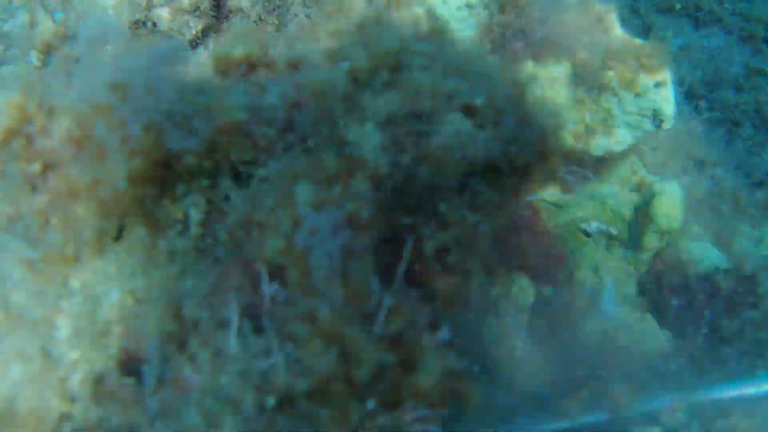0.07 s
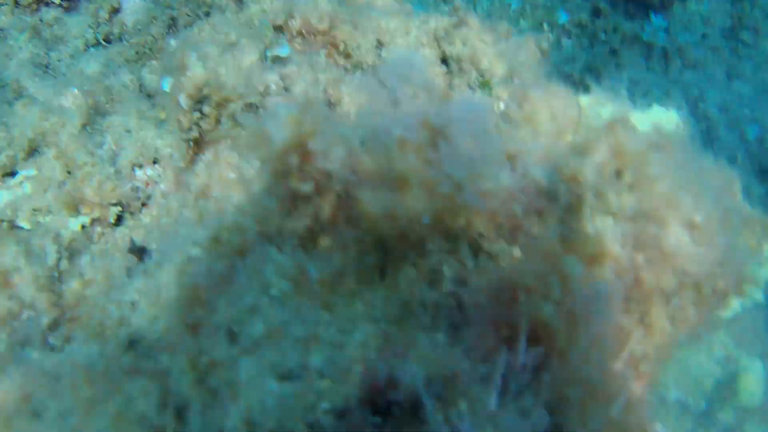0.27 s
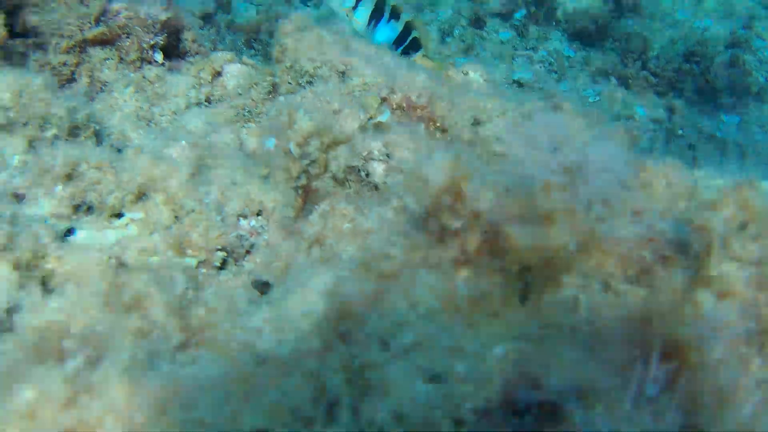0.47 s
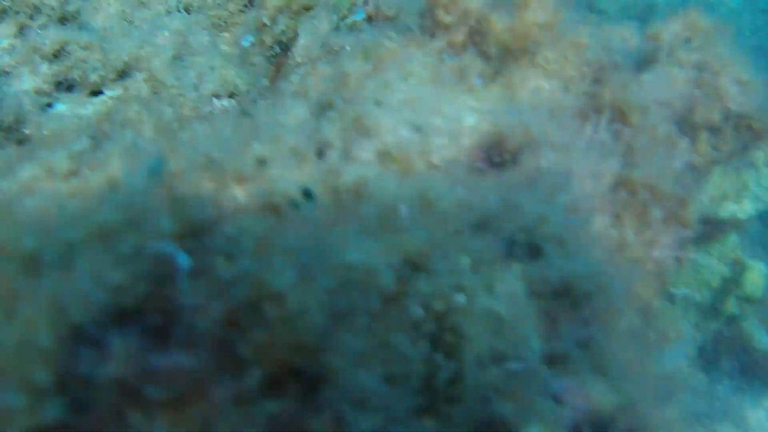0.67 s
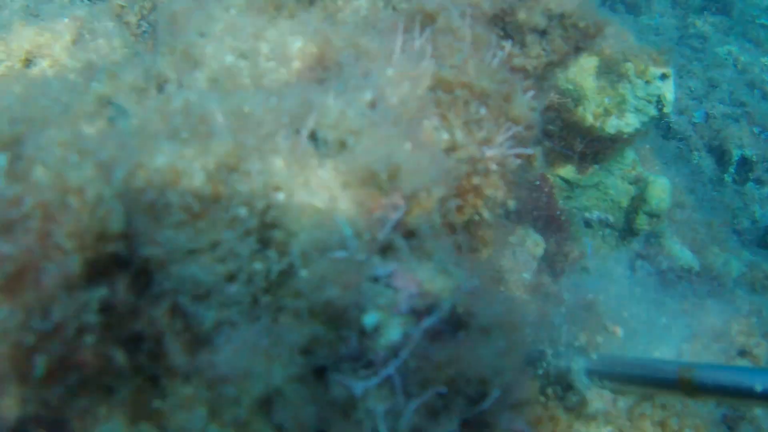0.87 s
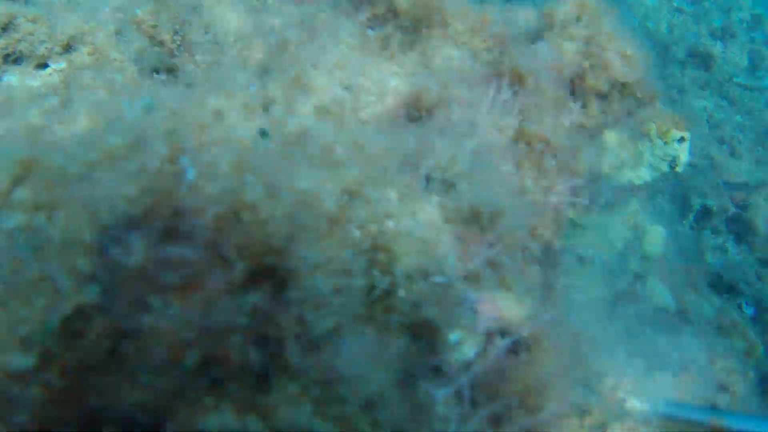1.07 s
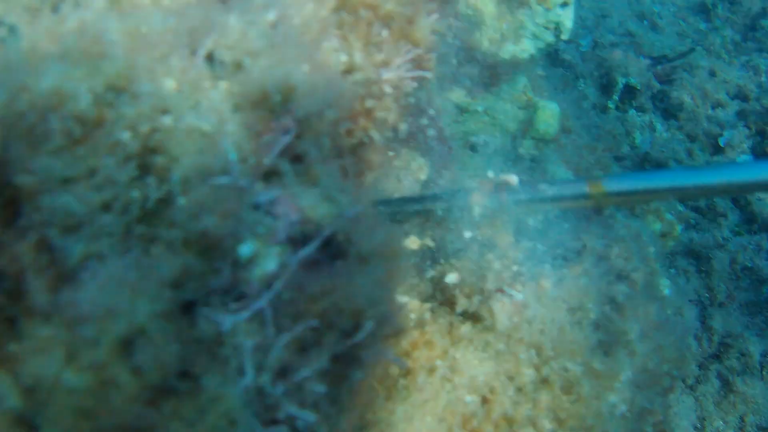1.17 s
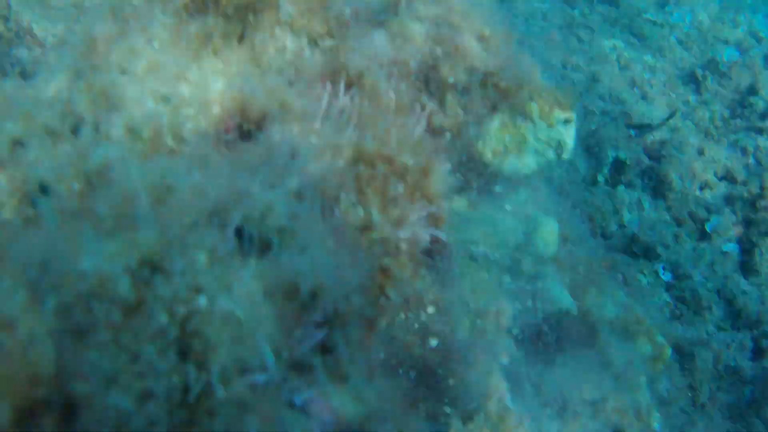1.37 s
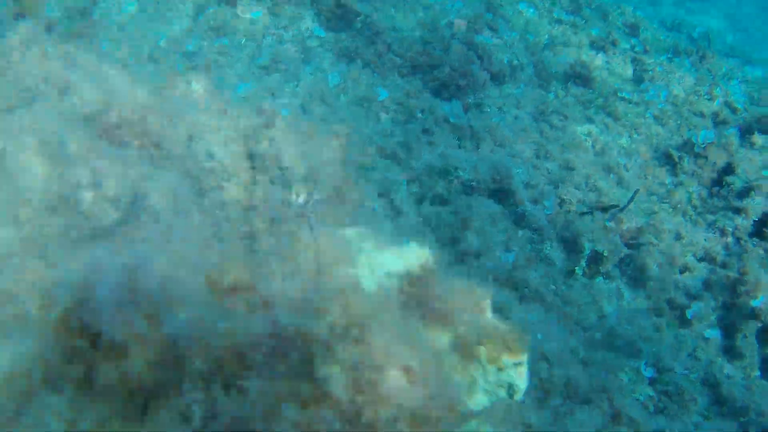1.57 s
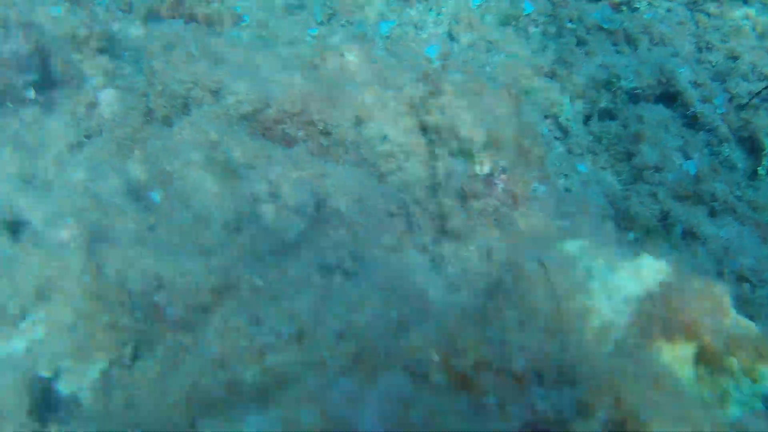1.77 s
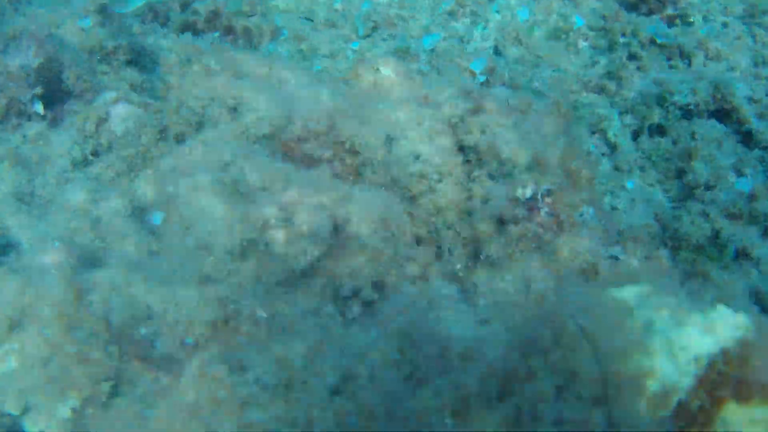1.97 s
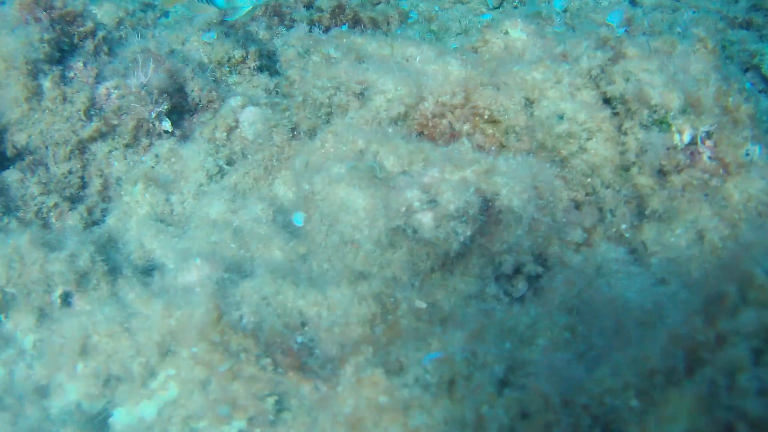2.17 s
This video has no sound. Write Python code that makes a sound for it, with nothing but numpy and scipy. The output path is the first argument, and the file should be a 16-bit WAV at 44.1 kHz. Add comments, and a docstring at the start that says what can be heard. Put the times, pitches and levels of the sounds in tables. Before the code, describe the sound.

Dull thumps and hollow knocks jostle an underwater camera housing throughout, heard close and muffled from inside. They come irregularly, with short rubs and slight gritty crunches, strongest at the start, around 0.7 to 1.0 seconds, near 1.3 and in a rapid flurry at 1.5. After a brief lull, softer bumps continue until about 2.2 seconds. Churning seawater rumbles underneath, with faint reef fizz and clicks.

```python
"""Irregular bumps of a sealed camera housing, jostled over a rocky, weedy seabed under churning seawater.
Each bump shoves the water with a dull thump, knocks the case, rings its wall and crunches a little grit.
Between the bumps the case rubs along in quick slips and eddies rumble round it.
Faint fizz, crackle and clicks come from the reef behind."""
import sys
import numpy as np
from scipy import signal
from scipy.fft import rfft, irfft, next_fast_len
from scipy.io import wavfile
from scipy.ndimage import uniform_filter1d, map_coordinates

SR = 44100
rng = np.random.default_rng(int(sys.argv[2]) if len(sys.argv) > 2 else 0)


def materialize(psi):
    """Save the field psi as 16-bit PCM at rate SR to the path in sys.argv[1].

    A 1-D psi becomes a single channel; in a 2-D psi each row is a channel.
    """
    bounded = np.clip(np.atleast_2d(psi).T, -1, 1)
    quanta = np.round(bounded * 32767).astype(np.int16)
    wavfile.write(sys.argv[1], SR, quanta)


N = 97240


def amp(db):
    """Decibels to gain."""
    return 10 ** (np.asarray(db) / 20)


def unit(x):
    """Scale to rms 1."""
    return x / np.sqrt(np.mean(x ** 2) + 1e-20)


def crest(x):
    """Scale so that the envelope, averaged over a millisecond, peaks at 1."""
    return x / (uniform_filter1d(np.abs(signal.hilbert(x)), size=44).max() + 1e-12)


def add(track, s, sound):
    """Mix a sound into a track at time s."""
    i = max(round(s * SR), 0)
    track[i:i + len(sound)] += sound[:max(len(track) - i, 0)]


def wobble(rate):
    """A smooth random curve, rate knots a second."""
    return map_coordinates(rng.standard_normal(int(N * rate / SR) + 4), [np.arange(N) * rate / SR])


def response(points, modes=None, size=8192):
    """Impulse response of an EQ curve (f/Hz, level/dB), with resonances if given."""
    f = np.fft.rfftfreq(size, 1 / SR)
    hz, db = np.transpose(points)
    gain = amp(np.interp(np.log(f + 1), np.log(hz), db))
    if modes is not None:
        peaks = [amp(level) * f * width / (centre ** 2 - f ** 2 + 1j * f * width)
                 for centre, width, level in modes]
        gain = gain * np.sqrt(sum(np.abs(peak) ** 2 for peak in peaks))
    # minimum phase: nothing rings ahead of the hit
    cepstrum = irfft(np.log(np.maximum(gain, 1e-5)))
    cepstrum[1:size // 2] *= 2
    cepstrum[size // 2 + 1:] = 0
    return irfft(np.exp(rfft(cepstrum)))[:size // 2]


def through(x, ir):
    """Pass a signal through an impulse response."""
    return signal.fftconvolve(x, ir)[:len(x)]


def noise(ir):
    """Steady noise at rms 1, coloured by an impulse response."""
    return unit(through(rng.standard_normal(N), ir))


def focused(ir, centre_hz, boost_db, width_oct=0.33):
    """An impulse response with a bell boost round centre_hz."""
    hz = np.geomspace(100, 16000, num=80)
    bell_db = boost_db * np.exp(-(np.log2(hz / centre_hz) / width_oct) ** 2)
    return through(ir, response(np.column_stack([hz, bell_db])))


def grains(rate, scatter_db, size=N):
    """Random impulses of scattered strength, about rate a second."""
    fires = rng.random(size) < rate / SR
    strength = amp(scatter_db * np.clip(rng.standard_normal(size), -2, 2))
    return fires * np.sign(rng.standard_normal(size)) * strength


def swell(t, rise_s, shape):
    """An envelope that crests at rise_s and then dies; a higher shape is tighter."""
    return (t / rise_s * np.exp(1 - t / rise_s)) ** shape


# hollow modes of the case and brighter modes of its wall (f/Hz, width/Hz, level/dB)
CASE_MODES = [(312.5, 110, 0.5), (494.6, 21, -2), (599, 51, -2), (778.6, 64.5, 0)]
WALL_MODES = [(1192, 78, 1.5), (1453, 43, -8.5), (1660, 154, -4), (2154, 126, -6), (2840, 1300, -22)]
# EQ curves of the case, the wall and the grit (f/Hz, level/dB)
CASE_EQ = [(120, -31), (280, -1), (820, -5.5), (1020, -21.5), (2500, -80.5)]
WALL_EQ = [(700, -42), (1120, 4.5), (1750, 1.5), (3000, -6.5), (5000, -33)]
GRIT_EQ = [(900, -36), (2300, 9.5), (4000, 6.5), (6100, 5), (7300, -4.5), (8600, -0.5), (10000, -14),
           (15500, -22.5)]


def materials():
    """How the case, its wall and the grit each answer a sharp tap."""
    return response(CASE_EQ, CASE_MODES), response(WALL_EQ, WALL_MODES), response(GRIT_EQ)


GRIT_RISE_S = 0.00091


def crunch(t, grit):
    """A noise burst a few milliseconds long, with the colour of crushed grit."""
    burst = swell(t, GRIT_RISE_S, shape=0.51) * rng.standard_normal(len(t))
    return crest(through(burst, grit))


# fader ride shared by fizz and crackle (t/s, relative level/dB)
REEF_RIDE = [(0, -39.5), (.2, -50), (.3, -54), (.41, -47), (.6, -49), (.83, -53.5), (1.02, -58), (1.3, -52),
             (1.6, -65), (1.8, -59), (1.92, -55.5), (2.2, -50.5)]
# EQ curve of the fizz (f/Hz, level/dB)
FIZZ_EQ = [(900, 10), (2200, 6), (3600, -1.5), (4900, 0.5), (5500, -6.5), (6300, 1), (7300, -5),
           (8700, -2.5), (10000, -14), (15500, -15.5)]
# nearer reef clicks (t/s, centre f/Hz, level/dB)
REEF_CLICKS = [(0.107, 3050, -38.5), (0.743, 5860, -24), (0.885, 3160, -35.5), (0.925, 8800, -27),
               (1.66, 4200, -42), (2.018, 4420, -42.5), (2.162, 6440, -35.5)]
FIZZ_DB, CRACKLE_DB = -4, -11.5


def reef(grit):
    """The reef's faint bed of fizz, with sparse crackle and a few nearer clicks."""
    t = np.arange(SR // 30) / SR
    ride = amp(np.interp(np.arange(N) / SR, *np.transpose(REEF_RIDE)))
    fizz = noise(response(FIZZ_EQ))
    crackle = unit(through(grains(rate=60, scatter_db=-2.5), crunch(t, grit)))
    out = ride * (amp(FIZZ_DB) * fizz + amp(CRACKLE_DB) * crackle)
    for s, centre_hz, db in REEF_CLICKS:
        click = crunch(t, focused(grit, centre_hz, boost_db=8))
        add(out, s - GRIT_RISE_S, amp(db) * click)
    return out


# fader rides of the churning water (t/s, relative rumble level/dB, relative wash level/dB)
WATER_RIDE = [(0, -30, -14.5), (0.109, -38.5, -39), (.22, -32, -33.5), (.33, -37.5, -40), (.42, -31, -33),
              (.57, -21.5, -31), (.64, -33, -35), (.72, -26.5, -41), (.82, -29.5, -31.5), (.92, -20, -30.5),
              (1.04, -35.5, -36.5), (1.2, -35, -34.5), (1.32, -17.5, -34), (1.42, -36.5, -35),
              (1.579, -34, -40.5), (1.649, -47, -51), (1.719, -38.5, -37.5), (1.82, -27, -40),
              (1.94, -27.5, -33), (2.04, -33, -36.5), (2.2, -25.5, -30)]
# EQ curve of the rumble (f/Hz, level/dB)
RUMBLE_EQ = [(15, -37), (30, -4), (60, -3.5), (115, 4.5), (190, 1), (280, -13.5), (500, -38.5), (1200, -50),
             (3000, -100)]
RUMBLE_TRIM_DB, WASH_TRIM_DB, WALL_PATTER_DB, LUMP_DB = 2.5, -3, -20, 2.5


def water(case, wall):
    """Lumpy eddies rumble round the housing and wash against its walls."""
    s, rumble_db, wash_db = np.transpose(WATER_RIDE)
    t = np.arange(N) / SR
    lumps_db = LUMP_DB * wobble(rate=39.71)
    rumble_gain = amp(np.interp(t, s, rumble_db) + RUMBLE_TRIM_DB + lumps_db)
    wash_gain = amp(np.interp(t, s, wash_db) + WASH_TRIM_DB + lumps_db)
    rumble, wash = noise(response(RUMBLE_EQ)), noise(case)
    patter = unit(through(grains(rate=210, scatter_db=3.5), wall))
    return rumble_gain * rumble + wash_gain * (wash + amp(WALL_PATTER_DB) * patter)


# rubs along the housing (t/s, length/s, centre f/Hz, case level/dB, wall level/dB, grit level/dB)
RUB_CUES = [(0.0, 0.026, 580, -22.5, -30, -46.5), (0.185, 0.02, 440, -32.5, -45, -50.5),
            (0.217, 0.027, 880, -34, -44.5, -74), (0.284, 0.023, 727, -44, -44.5, -56),
            (0.345, 0.044, 780, -27, -38.5, -55.5), (0.396, 0.062, 433, -30.5, -42.5, -51.5),
            (0.565, 0.034, 500, -24, -41.5, -42), (0.681, 0.048, 366, -25.5, -58, -57),
            (0.738, 0.047, 530, -24.5, -33, -46), (0.844, 0.093, 410, -25, -54, -69),
            (1.051, 0.048, 400, -30.5, -47, -68), (1.231, 0.052, 685, -20.5, -41, -64.5),
            (1.324, 0.026, 555, -21.5, -34.5, -50.5), (1.473, 0.078, 728, -20.5, -33, -55),
            (1.889, 0.028, 586, -28.5, -54, -55), (2.075, 0.029, 860, -29, -55.5, -84)]
RUB_ATTACK_S, RUB_RELEASE_S, SLIPS_PER_S, GRIT_TICKS_PER_S = 0.0011, 0.0015, 650, 380


def rubs(case, wall, grit):
    """Quick irregular slips excite the case and the wall; sparser grains of grit tick on top."""
    out, t = np.zeros(N), np.arange(SR // 5) / SR
    for s, length, centre_hz, case_db, wall_db, grit_db in RUB_CUES:
        stroke = np.clip(t / RUB_ATTACK_S, 0, 1) * np.exp(-np.maximum(t - length, 0) / RUB_RELEASE_S)
        stroke_rms = np.sqrt(np.mean(stroke ** 2))
        layers = [(case_db, SLIPS_PER_S, focused(case, centre_hz, boost_db=9.5)),
                  (wall_db, SLIPS_PER_S, wall),
                  (grit_db, GRIT_TICKS_PER_S, crunch(t, grit))]
        for db, rate, ir in layers:
            slips = stroke * grains(rate, scatter_db=0, size=len(t))
            add(out, s, amp(db) * stroke_rms * unit(through(slips, ir)))
    return out


def pulse(t, hz, rise_cycles, shape):
    """A heavily damped swing of a cycle or two; higher ones are shorter."""
    return swell(t, rise_cycles / hz, shape) * np.sin(2 * np.pi * (hz * t - rise_cycles))


# hits on the housing, levels relative within each layer (t/s, thump f/Hz, thump level/dB,
# knock f/Hz, knock level/dB, ring centre f/Hz, ring level/dB, grit level/dB)
BUMP_CUES = [(0.007, 160, -10.5, 550, -3, 1720, -16, -24),
             (0.045, 169, -10.5, 434, -14.5, 2550, -15.5, -21.5),
             (0.148, 170, -13.5, 560, -12, 1630, -29, -59), (0.161, 213, -19, 463, -14.5, 1630, -28, -38),
             (0.347, 205, -24, 640, -9.5, 1570, -24, -48), (0.359, 185, -8, 475, -11, 1850, -24.5, -35),
             (0.373, 190, -8.5, 680, -18, 1410, -36, -56), (0.383, 193, -14.5, 650, -13, 1850, -31, -44),
             (0.44, 205, -13, 450, -6.5, 1690, -26, -25.5), (0.454, 170, -15.5, 560, -13.5, 1310, -36, -45),
             (0.475, 165, -14, 600, -16.5, 1380, -33.5, -40), (0.504, 146, -11, 392, -15, 1410, -36, -42),
             (0.539, 168, -14, 500, -24, 1300, -42, -39.5), (0.551, 162, -9, 476, -31, 1400, -37, -47),
             (0.576, 167, -5.5, 460, -33, 1600, -40, -30.5), (0.592, 150, -4, 548, -12.5, 1380, -21, -30),
             (0.663, 154, -15.5, 600, -20, 1480, -34.5, -45),
             (0.707, 180, -14.5, 354, -17, 1500, -34.5, -39), (0.74, 135, -2, 620, -5.5, 1410, -22.5, -24),
             (0.746, 149, -38, 465, -5, 1420, -22, -25.5), (0.759, 160, -9.5, 490, -15, 1430, -28, -34),
             (0.776, 145, -2.5, 550, -10.5, 1550, -15.5, -27.5),
             (0.86, 190, -9, 420, -7.5, 1360, -37.5, -48), (0.896, 219, -3.5, 440, -2, 1500, -25.5, -40),
             (0.923, 185, -8, 400, -2.5, 1570, -18.5, -35), (0.956, 154, -10.5, 400, -12, 1180, -29, -56),
             (0.988, 150, -9.5, 398, -5, 1360, -28, -44), (1.167, 115, -18, 580, -23.5, 1290, -42, -58),
             (1.273, 144, -2, 502, -12.5, 1420, -21.5, -41.5),
             (1.315, 164, -10.5, 510, -10, 1250, -36, -66), (1.327, 121, -2.5, 532, -11, 1400, -43.5, -52),
             (1.344, 143, -1, 600, -7, 1340, -27, -33.5), (1.397, 132, -18.5, 388, -23, 1380, -36.5, -63),
             (1.446, 170, -19.5, 470, -26, 1680, -37.5, -48),
             (1.482, 146, -13.5, 640, -5.5, 1330, -14, -30), (1.5, 172, -5.5, 584, -12, 2300, -24, -38),
             (1.51, 162, -10.5, 580, -11, 1570, -15.5, -27.5),
             (1.518, 151, -2.5, 730, -14, 1280, -19.5, -29), (1.53, 163, -6, 520, -23, 1310, -37, -53.5),
             (1.539, 153, -6, 730, -23, 1200, -17.5, -41), (1.548, 144, -1.5, 555, -4.5, 1180, -23, -32.5),
             (1.747, 132, -8, 496, -28, 1300, -61, -57), (1.811, 157, -8.5, 336, -20.5, 1290, -66, -47.5),
             (1.865, 149, -19, 553, -24.5, 1300, -55, -53), (1.892, 195, -5.5, 423, -25, 1310, -39.5, -44),
             (1.909, 163, -7, 516, -14, 1330, -43, -52), (2.056, 158, -11.5, 348, -40, 1300, -62, -50),
             (2.07, 172, -14, 544, -17.5, 1390, -46, -45), (2.145, 130, -15.5, 425, -18, 1300, -45, -57)]
THUMP_TRIM_DB, KNOCK_TRIM_DB, GRIT_TRIM_DB = 0.5, -3.5, -3
THUMP_RISE_CYCLES, RING_RISE_S = 0.74, 0.001
BOOM_HZ, BOOM_T60_S, BOOM_DB = 117, 0.073, -15.5  # the whole housing sways on after a thump
RATTLE_DECAY_S, RATTLE_DB = 0.0019, -4.5  # a burst stirs the case modes under each knock
GRIT_LEAD_S = 0.00057  # grit gives way just before the case is hit


def bumps(case, wall, grit):
    """Each hit stacks a low shove of water, a hollow knock, a short wall ring and a crunch."""
    out, t = np.zeros(N), np.arange(SR // 8) / SR
    boom_envelope = amp(BOOM_DB - 60 * t / BOOM_T60_S) * (1 - np.exp(-t * BOOM_HZ))
    boom = boom_envelope * np.sin(2 * np.pi * (BOOM_HZ * t - THUMP_RISE_CYCLES))
    for s, thump_hz, thump_db, knock_hz, knock_db, ring_hz, ring_db, grit_db in BUMP_CUES:
        thump = pulse(t, thump_hz, THUMP_RISE_CYCLES, shape=2.04) + boom
        burst = np.exp(-t / RATTLE_DECAY_S) * rng.standard_normal(len(t))
        rattle = crest(through(burst, case))
        knock = pulse(t, knock_hz, rise_cycles=1.369, shape=8.1) + amp(RATTLE_DB) * rattle
        struck_wall = focused(wall, ring_hz, boost_db=13)
        ring_attack = (1 - np.exp(-t[:len(struck_wall)] / RING_RISE_S)) ** 2
        add(out, s, amp(thump_db + THUMP_TRIM_DB) * thump)
        add(out, s, amp(knock_db + KNOCK_TRIM_DB) * knock)
        add(out, s, amp(ring_db) * crest(struck_wall * ring_attack))
        add(out, s - GRIT_LEAD_S, amp(grit_db + GRIT_TRIM_DB) * crunch(t, grit))
    return out


def scene():
    """Bumps and rubs up front, water and reef behind, in mono as heard inside the housing."""
    case, wall, grit = materials()
    mix = bumps(case, wall, grit) + rubs(case, wall, grit) + water(case, wall) + reef(grit)
    return mix[None]


# EQ curve of the camera's hiss (f/Hz, level/dB)
HISS_EQ = [(900, 10.5), (2500, 1.5), (3600, -0.5), (4800, 11), (5800, -13), (7500, -1.5), (10000, -2),
           (15500, -5.5)]
HISS_DB, LOW_CUT_HZ, HIGH_CUT_HZ = -59.5, 100.3, 15900


def record(dry):
    """The camera thins the deep bass, hisses faintly, soft-clips the peaks and cuts the very top."""
    thin = signal.sosfilt(signal.butter(1, LOW_CUT_HZ, "highpass", fs=SR, output="sos"), dry)
    hissy = thin + amp(HISS_DB) * noise(response(HISS_EQ))
    rounded = hissy / (1 + np.abs(hissy) ** 8) ** (1 / 8)
    size = next_fast_len(N + SR // 4)
    passband = np.fft.rfftfreq(size, 1 / SR) < HIGH_CUT_HZ
    return irfft(rfft(rounded, size) * passband, size)[..., :N]


dry = scene()
out = record(dry)
materialize(out)
```